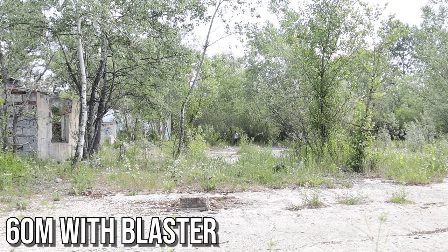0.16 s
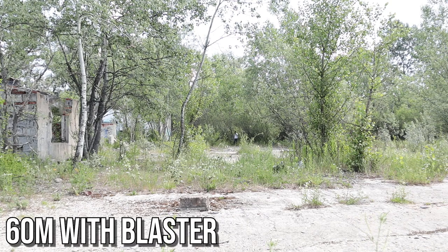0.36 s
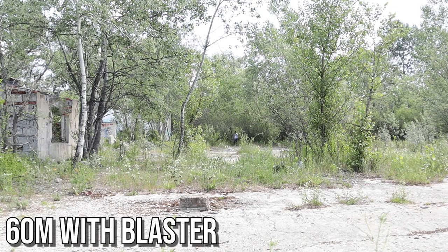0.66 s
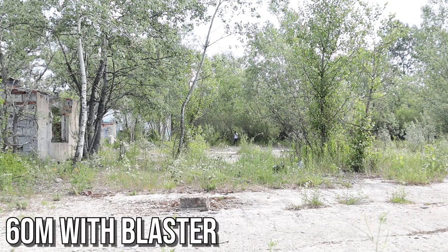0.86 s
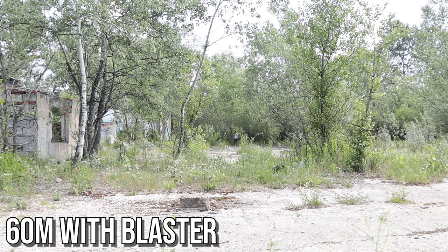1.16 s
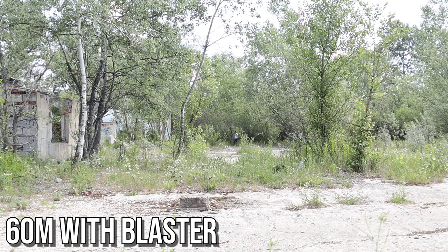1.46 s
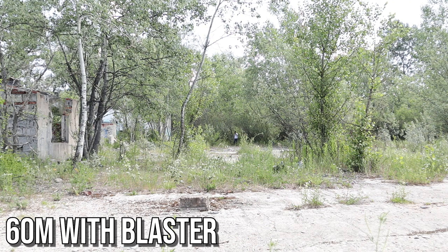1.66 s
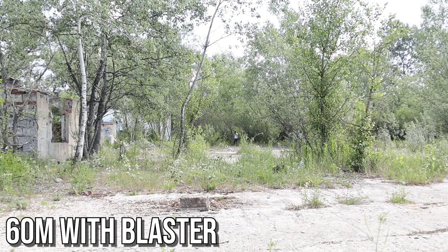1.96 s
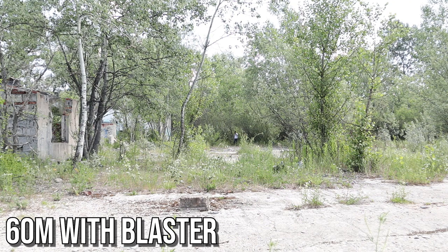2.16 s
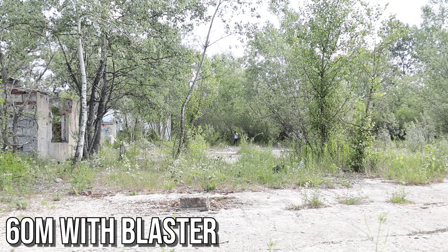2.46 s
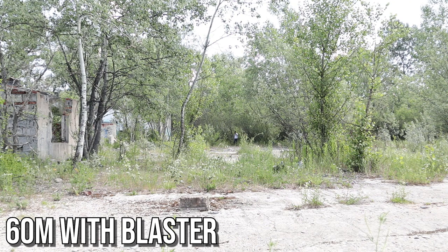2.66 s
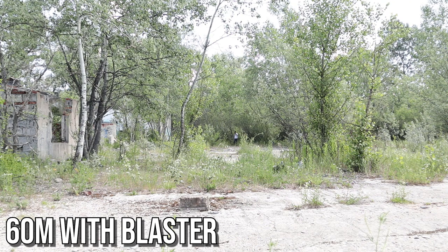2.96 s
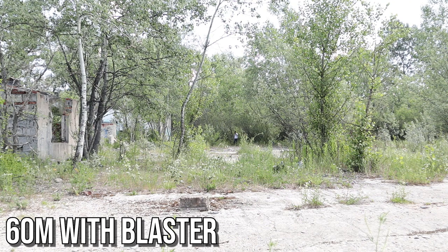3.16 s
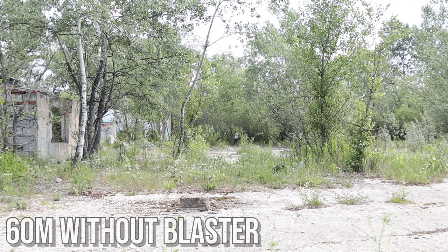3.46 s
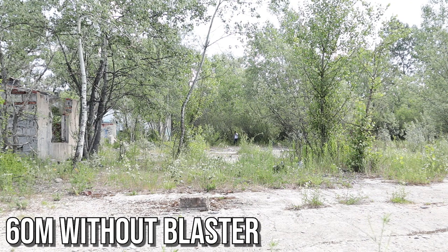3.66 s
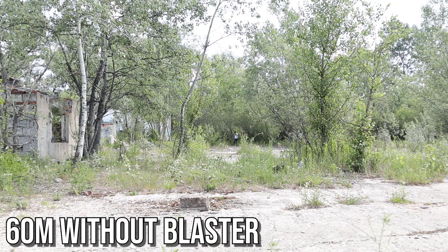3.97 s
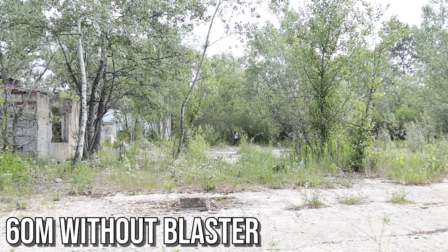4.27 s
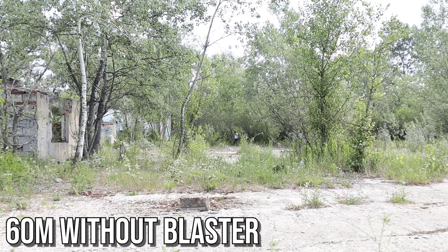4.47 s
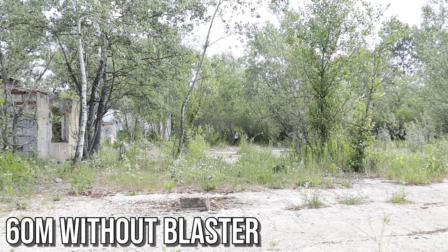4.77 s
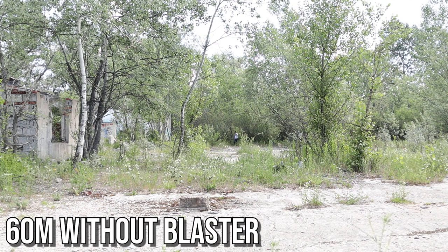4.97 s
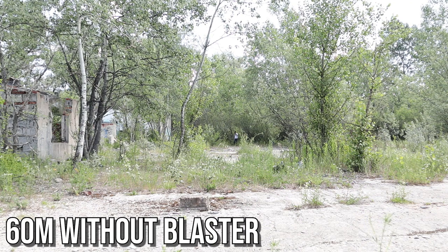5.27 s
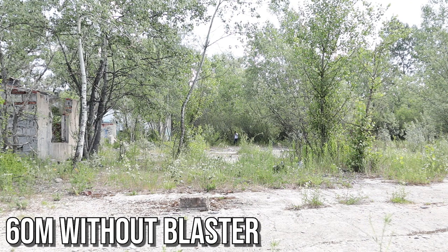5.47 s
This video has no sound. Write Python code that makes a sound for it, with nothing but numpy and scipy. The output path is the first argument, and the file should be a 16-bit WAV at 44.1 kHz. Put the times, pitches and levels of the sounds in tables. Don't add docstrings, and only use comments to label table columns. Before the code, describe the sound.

A quiet overgrown outdoor lot, heard from far away by one microphone, almost mono. The scattered tail of a shot just before the start opens the scene. An electric airsoft rifle fires single shots at about 0.75, 1.7 and 2.6 s: a very short rising gear whirr, a hard dry piston clack, then a dull wall slap and diffuse tree echoes. Small pellet ticks on stone or board come at 0.8, 0.9, 1.2, 1.9, 2.8 and 2.9 s. With the muzzle attachment gone, shots at 3.6, 4.4 and 5.4 s are sharper, brighter, with quicker early slaps. A small bird sings from 3.75 s: three arching whistles, falling notes from 4.3 s, then quick low falls and upward flicks until 5.5 s; faint bird calls sit at 0.4 and 1.1 s. A faint pellet tick falls near 5.1 s. Soft low town hum continues throughout, with distant engine rumble strongest around 0.75 s, again at 1.5 and 3.7 s.

```python
import sys
import numpy as np
from scipy import signal
from scipy.fft import irfft
from scipy.io import wavfile
from scipy.ndimage import uniform_filter1d

SR = 44100
rng = np.random.default_rng(int(sys.argv[2]) if len(sys.argv) > 2 else 0)


def elevation(decibels):
    levels = np.asarray(decibels, float)
    return 10 ** (levels / 20)


def dump_mix(stems):
    frames = np.atleast_2d(stems).T
    limited = np.clip(frames, -1, 1)
    pcm = np.round(limited * 32767).astype(np.int16)
    wavfile.write(sys.argv[1], SR, pcm)


N = 247842

# (time [s], level [dB])
SHOTS = [
    [(-.1005, -11), (0.7495, -11.5), (1.674, -11.5), (2.645, -11)],
    [(3.5946, -16), (4.4411, -16), (5.3888, -15.5)],
]
# (frequency [Hz], width [Hz], level [dB])
MUZZLE_MODES = [
    [(1470, 65, -17.5), (1730, 500, -14), (2600, 1560, -5.5), (3810, 690, -5.5), (5700, 900, -55),
     (9900, 750, -19), (294, 276, -23)],
    [(1500, 360, -21), (2038, 1300, -12.5), (3238, 130, -22), (3900, 1840, -5), (5070, 420, -9),
     (6850, 1200, -4.5), (11500, 1900, -17), (304, 320, -12)],
]


def rifle(place):
    t = np.arange(-.06, 1, 1 / SR)
    out = np.zeros(N)
    for muzzle, shots in enumerate(SHOTS):
        knocks, clean_slam, _ = stroke(t, muzzle)
        for slam_s, db in shots:
            fresh_rattle = .35 * stroke(t, muzzle)[2]
            blast = elevation(db) * ring(knocks + fresh_rattle, MUZZLE_MODES[muzzle])
            slam = elevation(db) * ring(clean_slam + fresh_rattle, MUZZLE_MODES[muzzle])
            gears = motor(t) + trigger(t)
            scatter = signal.fftconvolve(slam + gears, place)[:len(t)]
            add(out, slam_s + t[0], blast + gears + walls(blast, muzzle) + scatter)
    return out


# straight path over the grass, level [dB]
SLAM_DB = [-1.5, -3]
# loose parts shaking around the slam, level [dB]
RATTLE_DB = [-27, -29]
# (first level [dB], last level [dB])
CHATTER_DB = [(-16, -17), (-19, -11)]
# (delay [s], level [dB])
REBOUND = [(.0005, -9), (.0009, -8)]
SUCK_S = [.00017, .00011]
# depth of that dip, level [dB]
SUCK_DB = [-8, -1]
BOUNCE_S = [.0035, .0031]
# (first level [dB], last level [dB])
BOUNCE_DB = [(-10, -15), (-12, -16)]
RUN_UP_S = .0041


def stroke(t, muzzle):
    def click(s):
        return np.sinc((t - s) * SR * .9)

    shake = (t > -RUN_UP_S) * np.exp(-abs(t) / np.where(t < 0, .006, .008))
    rattle_noise, air_noise = rng.standard_normal((len(t), 2)).T
    rattle = colour(rattle_noise * shake * elevation(RATTLE_DB[muzzle]), [(6000, 0), (8500, -10)])
    puff = np.exp(-abs(t - .0006) / .0014) * elevation(-15)
    hiss = colour(air_noise * puff, [(6500, -30), (8500, 0)])

    rebound_s, rebound_db = REBOUND[muzzle]
    chatter_s = -RUN_UP_S * np.array([1, 2 / 3, 1 / 3])
    times = np.r_[chatter_s, rebound_s, BOUNCE_S[muzzle] * np.arange(1, 5)]
    chatter_db = np.linspace(*CHATTER_DB[muzzle], num=3)
    db = np.r_[chatter_db, rebound_db, np.linspace(*BOUNCE_DB[muzzle], num=4)]
    sign = np.where(times == BOUNCE_S[muzzle], -1, 1)
    bounces = colour(sign * elevation(db) @ click(times[:, None]), [(6000, 0), (8500, -12)])

    slam = click(0) - elevation(SUCK_DB[muzzle]) * click(-SUCK_S[muzzle])
    slam = colour(slam, [(6000, 0), (8500, -7)]) + hiss
    return elevation(SLAM_DB[muzzle]) * slam + bounces + rattle, slam, rattle


# (time from the slam [s], gear mesh [Hz], effort [dB])
MOTOR = [
    (-.0485, 700, -55),
    (-.045, 820, -60),
    (-.036, 990, -56),
    (-.024, 1300, -48),
    (-.011, 1567, -54),
    (-.006, 1705, -46),
    (.015, 1800, -44.5),
    (0.052, 1500, -48.5),
    (.09, 874, -57),
]
# (multiple of mesh, level [dB])
MESH = [(1, -9), (2, -8), (3, -2), (4, -9), (5, -16), (6, -13)]
# (frequency [Hz], width [Hz], level [dB])
GEARBOX = [(2300, 320, -1.5), (3700, 740, 15.5), (5000, 620, 8.5), (7900, 1500, -18)]


def motor(t):
    s, mesh_hz, effort_db = np.transpose(MOTOR)
    speed = np.interp(t, s, mesh_hz) * rng.uniform(1.0, 1.04)
    uneven = 1 + .015 * evened(uniform_filter1d(rng.standard_normal(len(t)), size=40))
    turns = np.cumsum(speed * uneven) / SR
    whine = sum(elevation(db) * np.sin(2 * np.pi * (k * turns + rng.random())) for k, db in MESH)
    scrape = 0.48 + (turns % 1 < .3)
    grind = evened(ring(rng.standard_normal(len(t)) * scrape, GEARBOX))
    effort = elevation(np.interp(t, s, effort_db, left=-120, right=-120))
    load = np.clip(.25 - t / 0.014, .25, 1)
    return effort * (grind + whine * load)


# (frequency [Hz], width [Hz], level [dB])
TRIGGER = [(3900, 220, -65), (5070, 210, -68), (1500, 690, -74)]


def trigger(t):
    return ring(rng.standard_normal(len(t)) * (abs(t + .0478) < .0007), TRIGGER)


# (delay [s], level with can [dB], level bare [dB], dulled above [Hz])
WALLS = [(.0182, -24, -9, 3900), (.0215, -26, -12, 3900), (.039, -5, -8, 1630), (0.0377, -20, -13, 4540),
         (0.087, -24.5, -20.5, 4470), (0.195, -26.5, -26, 3500), (.432, -27, -44, 1703),
         (.439, -33, -42, 1300)]


def walls(x, muzzle):
    out = np.zeros(len(x))
    for delay_s, *db, dull_hz in WALLS:
        lowpass = signal.butter(4, dull_hz, fs=SR, output="sos")
        add(out, delay_s, elevation(db[muzzle]) * signal.sosfilt(lowpass, x))
    return out


# (frequency [Hz], near t60 [s], far t60 [s], colour [dB])
LOT = [(296, 0.074, 0.39, 7), (940, 0.17, 0.56, 10.5), (1500, 0.22, .9, -2), (3500, 0.1, 0.9, -1),
       (6130, 0.41, 0.72, -1.5), (10300, 0.46, 0.27, -4.5), (16000, 0.21, 0.23, 3)]
NEAR_DB, FAR_DB = -7, -13.5
SCATTER_RISE_S = .017


def lot():
    strength = elevation(2.0 * np.minimum(rng.exponential(1, SR), 2))
    taps = rng.standard_normal(SR) * strength * (rng.random(SR) < .4)
    hz, t, z = signal.stft(evened(taps), SR, nperseg=128)
    near = elevation(NEAR_DB - 60 * t / read(LOT, hz)[:, None])
    far = elevation(FAR_DB - 60 * t / read(LOT, hz, column=2)[:, None])
    tint = elevation(read(LOT, hz, column=3))[:, None]
    tail = signal.istft(z * np.hypot(near, far) * tint, SR, nperseg=128)[1][:SR]
    rise = np.clip(np.arange(SR) / SR / SCATTER_RISE_S, 0, 1) ** 2
    return tail * rise / np.sqrt(0.032 * SR)


# (frequency [Hz], level [dB])
PATH = [(100, -14.5), (500, -10.5), (950, -0.5), (1300, 2), (5600, 1), (6800, -4), (8000, -8),
        (11000, -4.5), (13000, -12), (16000, -25)]


def across_lot(x):
    return colour(x, PATH)


# (time [s], level [dB], low ring share [dB], slow debris [dB])
PELLETS = [
    [(0.8075, -23, -10, -30), (1.2122, -34.5, -4.5, -24), (5.0896, -49, 14, -3.5)],
    [(.882, -25, 2.5, -18.5), (1.8805, -28, 4.5, -13), (2.8086, -35.5, -6, -8), (2.9172, -38.5, 7.5, -9)],
]
# (low ring [Hz], high ring [Hz], level at 3.3 kHz [dB], at 8 kHz [dB], at 16 kHz [dB])
STRUCK = [
    (4450, 13000, -3, 2, -8.5),
    (2842, 5700, -7, -4.5, -13),
]
# (time [s], spread [s], level [dB])
TREELINE = (0.091, 0.017, -11)
CRACK_S, DEBRIS_DB, TICK_DB = 0.00076, -2, -0.5
HUMP_DB, HUMP_OCTAVES = 9, 0.23


def pellets(place):
    t = np.arange(0, .6, 1 / SR)
    out = np.zeros(N)
    late_s, spread_s, swell_db = TREELINE
    place = place[:len(t)] * (1 + elevation(swell_db + 18.0) * np.exp(-((t - late_s) / spread_s) ** 2))
    hz = np.geomspace(900, 16000, num=60)

    def hump(ring_hz):
        return np.exp(-(np.log2(hz / ring_hz) / HUMP_OCTAVES) ** 2)

    crack = t / CRACK_S * np.exp(1 - t / CRACK_S)
    onset = np.clip(t / 0.0012, 0, 1) ** 2
    impulse = np.exp(-t * SR)
    for hits, (low_hz, high_hz, low_end_db, mid_db, top_db) in zip(PELLETS, STRUCK):
        slope = read([(900, -48), (2200, low_end_db - 1), (3300, low_end_db), (4000, 1.5),
                      (8000, mid_db), (16000, top_db)], hz)
        for s, db, low_db, slow_db in hits:
            debris = elevation(DEBRIS_DB) * onset * (np.exp(-t / 0.011) + elevation(slow_db) * np.exp(-t / 0.11))
            bands = np.c_[hz, slope + (HUMP_DB + low_db) * hump(low_hz) + HUMP_DB * hump(high_hz)]
            tick = ring(impulse, [(low_hz, 450, TICK_DB + low_db), (high_hz, 600, TICK_DB)])
            hit = colour(rng.standard_normal(len(t)) * (crack + debris), bands) + tick
            snap = colour(impulse, bands)
            snap = snap * np.linalg.norm(hit) / np.linalg.norm(snap)
            scatter = elevation(-4.5) * signal.fftconvolve(snap, place)[:len(t)]
            add(out, s, (hit + scatter) * elevation(db) / abs(hit).max())
    return out


# (start [s], length [s], first pitch [Hz], farthest pitch [Hz], level [dB])
ARCHES = [
    (3.758, .098, 4150, 5700, -59),
    (3.927, .097, 4250, 5750, -55),
    (4.1, .105, 4250, 5600, -53),
]
FALLS = [
    (1.09, 0.14, 2160, 1920, -70),
    (4.279, 0.12, 4700, 3565, -52.5),
    (4.494, 0.058, 4720, 3730, -47),
    (4.68, 0.082, 4750, 3550, -54.5),
    (5.016, 0.052, 3330, 2700, -64),
    (5.181, .04, 3370, 2720, -66),
]
FLICKS = [
    (.44, 0.09, 2036, 2600, -69.5),
    (4.895, 0.074, 3820, 3000, -61),
    (5.057, 0.054, 3930, 5200, -55),
    (5.227, .044, 3770, 5004, -52.5),
    (5.473, 0.033, 3870, 3900, -54.5),
]
FALL_BEND, FLICK_BEND = 2.1, 5
ARCH_TOP, ARCH_WIDTH = .67, .2
ARCH_CREEP, ARCH_SINK = .55, -.5
LEAVES_S, LEAVES_DB, LEAVES_LINGER = .08, .5, .3


def bird():
    def arch(u):
        top = np.exp(-abs((u - ARCH_TOP) / ARCH_WIDTH) ** 1.8)
        drift = np.where(u < ARCH_TOP, ARCH_CREEP * u, ARCH_SINK * (u - ARCH_TOP))
        return top + (1 - top) * drift

    def fall(u):
        return u ** FALL_BEND

    def flick(u):
        return u ** FLICK_BEND

    out = np.zeros(N)
    for glide, notes in [(arch, ARCHES), (fall, FALLS), (flick, FLICKS)]:
        for s, *note in notes:
            add(out, s, whistle(glide, *note))
    t = np.arange(0, .7, 1 / SR)
    clumps = elevation(1.5 * evened(uniform_filter1d(rng.standard_normal(len(t)), size=300)))
    fade = 1 / (1 + (t / LEAVES_S) ** 4) + LEAVES_LINGER * elevation(-60 * t / .8)
    leaves = rng.standard_normal(len(t)) * clumps * fade
    return out + elevation(LEAVES_DB) * signal.fftconvolve(out, leaves / np.linalg.norm(leaves))[:N]


SWELL, SWELL_DB, ACCENT, ACCENT_DB = .3, -18, .07, 5
STRAIN_DB_PER_OCTAVE = -13
HASTE_DB = -.22
WAVER = .004


def whistle(glide, length_s, first_hz, far_hz, db):
    u = np.arange(0, length_s, 1 / SR) / length_s
    hz = first_hz + (far_hz - first_hz) * glide(u)
    octaves = np.log2(hz / first_hz)
    swell_db = SWELL_DB * np.clip(1 - u / SWELL, 0, 1) + ACCENT_DB * np.exp(-((u - SWELL) / ACCENT) ** 2)
    haste_db = HASTE_DB * np.maximum(np.gradient(octaves), 0) * SR
    effort_db = db + swell_db + STRAIN_DB_PER_OCTAVE * abs(octaves) + haste_db
    flutter = 1 + 0.12 * evened(uniform_filter1d(rng.standard_normal(SR // 4), size=120))[:len(u)]
    waver = 1 + WAVER * evened(uniform_filter1d(rng.standard_normal(SR // 4), size=150))[:len(u)]
    tone = np.sin(2 * np.pi * np.cumsum(hz * waver) / SR)
    return elevation(effort_db) * flutter * tone * signal.windows.tukey(len(u), .2)


# (frequency [Hz], level per Hz [dB])
AIR = [(20, -36), (32, -15), (50, -10), (80, -12.5), (125, -1.5), (190, -8.5), (300, -9), (340, -7.5),
       (390, -10.5), (590, -12.5), (980, -7.5), (2000, -18.5), (4200, -24), (14800, -31.5), (16000, -32)]
AIR_DB = -59.5


def air():
    frames, hz = N // 256 + 5, np.fft.rfftfreq(1024, 1 / SR)
    real, imag, patches = rng.standard_normal((frames, 513, 3)).T
    patches = evened(uniform_filter1d(uniform_filter1d(patches, 10, 0), 16, 1))
    drift_db = 1.0 * patches * np.clip(2500 / (hz + 1), .3, 1)[:, None]
    hum = (real + 1j * imag) * elevation(read(AIR, hz)[:, None] + drift_db)
    return elevation(AIR_DB) * evened(signal.istft(hum, nperseg=1024, noverlap=768)[1][:N])


# (time [s], level [dB], spread [s])
RUMBLE = [
    (.75, -57.5, .3),
    (1.1, -65, .15),
    (1.5, -61.5, 0.23),
    (2.55, -70, 0.15),
    (3.68, -61, 0.082),
    (5.33, -69, 0.087),
]
RUMBLE_DB = -69.5


def rumble():
    t = np.arange(N) / SR
    swells = sum(elevation(db) * np.exp(-((t - s) / spread_s) ** 2) for s, db, spread_s in RUMBLE)
    level = elevation(RUMBLE_DB) + swells
    band = signal.butter(2, [42, 70], "bandpass", fs=SR, output="sos")
    return level * elevation(-6) * evened(signal.sosfilt(band, rng.standard_normal(N)))


# (frequency [Hz], level [dB])
APART = [(30, -40), (150, -12), (350, 2.5), (700, -1.5), (1500, -8), (4000, -5.5), (7000, -2.5),
         (10000, -1.5), (13000, -2.5), (16000, -12)]
APART_DB = -83.5


def amplifier_hiss():
    return elevation(APART_DB) * evened(colour(rng.standard_normal(N), APART))


def evened(x):
    return x / np.sqrt(np.mean(x ** 2) + 1e-20)


def read(points, hz, column=1):
    rows = np.array(points, float)
    return np.interp(np.log(hz + 1), np.log(rows[:, 0] + 1), rows[:, column])


def add(mix, s, sound):
    at = round(s * SR)
    part = mix[max(at, 0):][:len(sound) + min(at, 0)]
    part += sound[max(-at, 0):][:len(part)]


def ring(x, modes):
    t = np.arange(2048) / SR
    body = sum(elevation(db) * np.exp(-np.pi * width_hz * t) * np.cos(2 * np.pi * hz * t)
               for hz, width_hz, db in modes)
    return signal.oaconvolve(x, body)[:len(x)]


def colour(x, points):
    taps = np.fft.fftshift(irfft(elevation(read(points, np.fft.rfftfreq(1024, 1 / SR)))))
    return signal.oaconvolve(x, taps * np.hanning(1024), "same")


def scene():
    place = lot()
    background = air() + rumble()
    shots = across_lot(rifle(place))
    return np.tile(background + shots + pellets(place) + bird(), (2, 1))


def roll_off(x):
    return signal.sosfilt(signal.butter(12, 16500, fs=SR, output="sos"), x)


def record(dry):
    hiss = amplifier_hiss()
    limited = colour(dry[0], [(15950, 0), (16150, -22), (16500, -30)])
    mix = limited + np.outer([1, -1], hiss)
    return roll_off(mix)


dry = scene()
out = record(dry)
dump_mix(out)
```